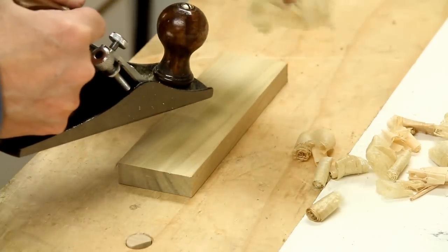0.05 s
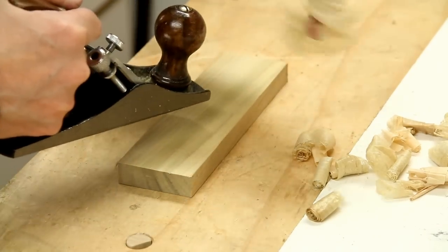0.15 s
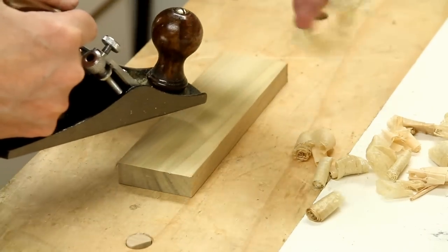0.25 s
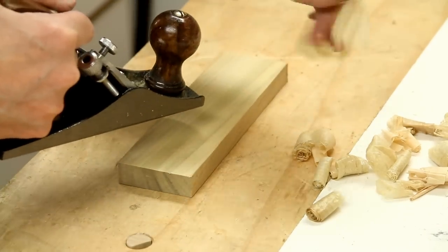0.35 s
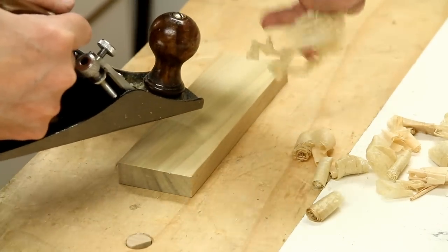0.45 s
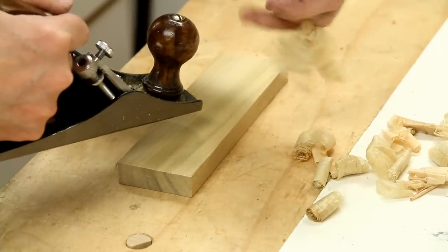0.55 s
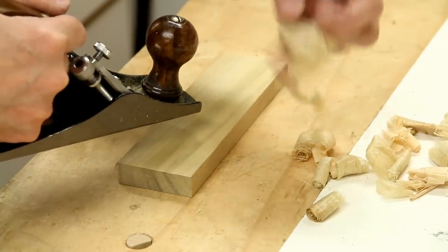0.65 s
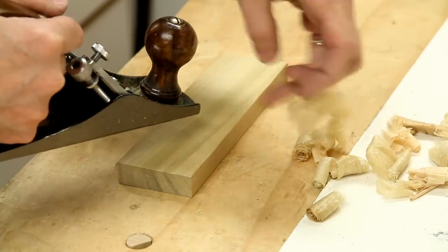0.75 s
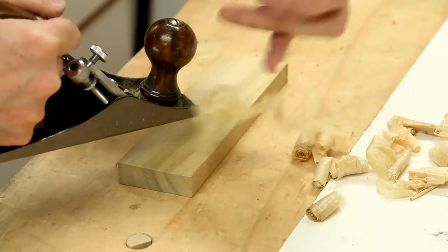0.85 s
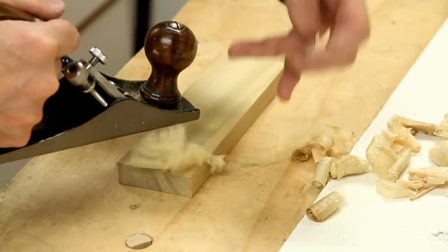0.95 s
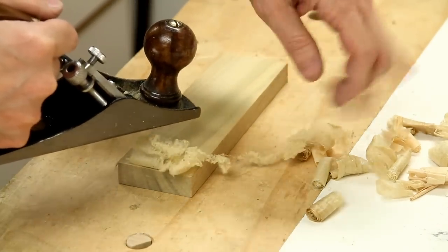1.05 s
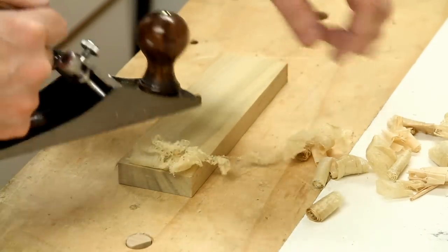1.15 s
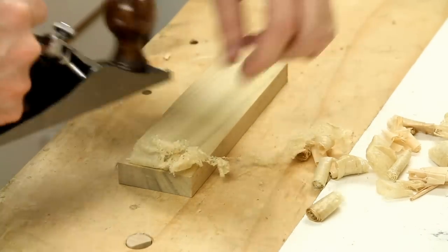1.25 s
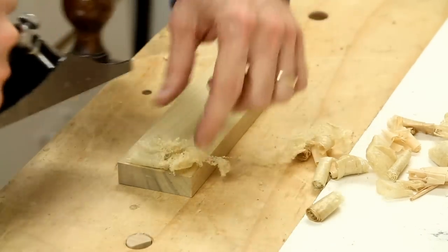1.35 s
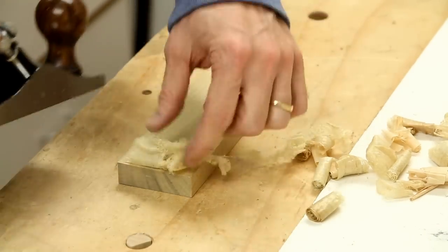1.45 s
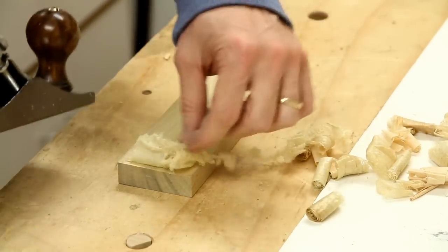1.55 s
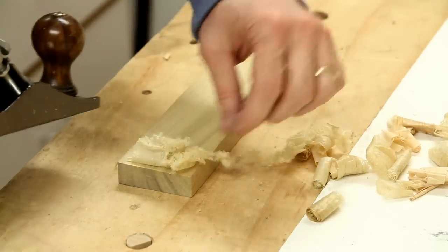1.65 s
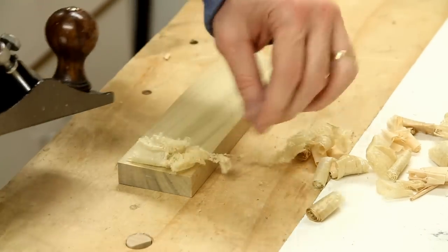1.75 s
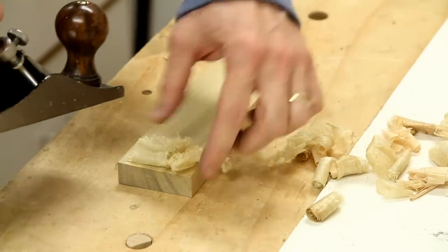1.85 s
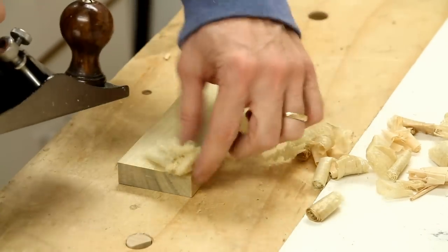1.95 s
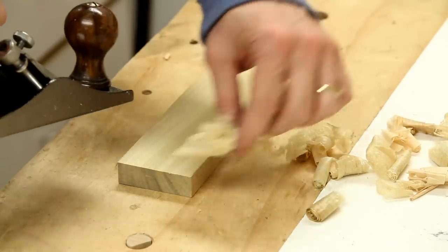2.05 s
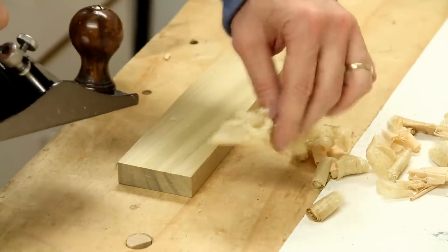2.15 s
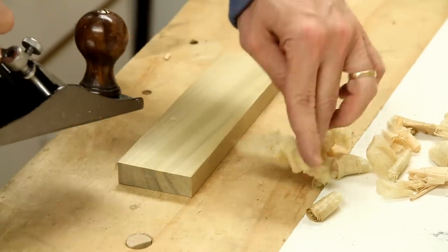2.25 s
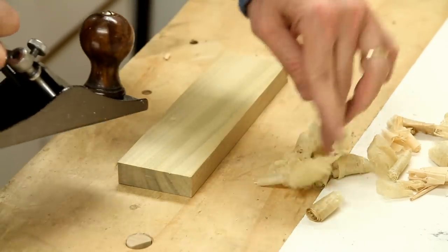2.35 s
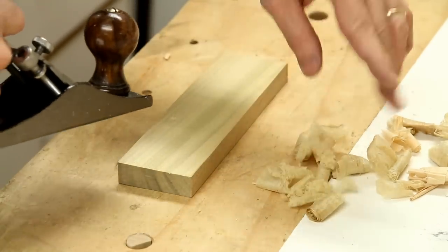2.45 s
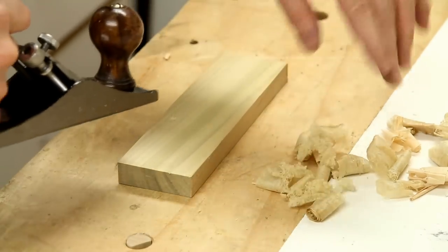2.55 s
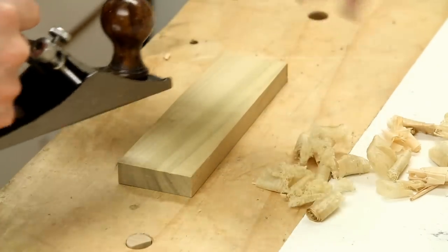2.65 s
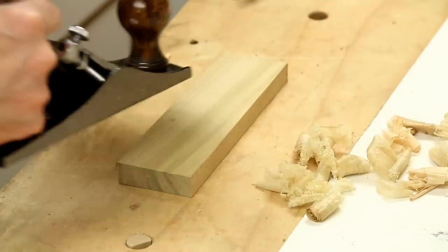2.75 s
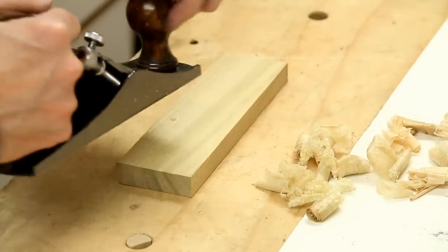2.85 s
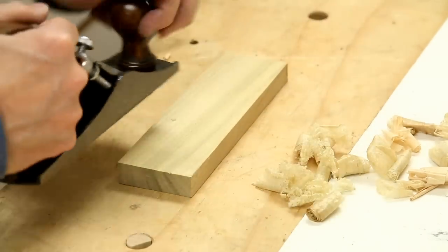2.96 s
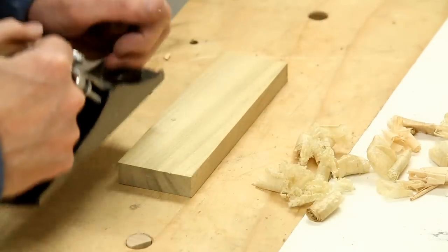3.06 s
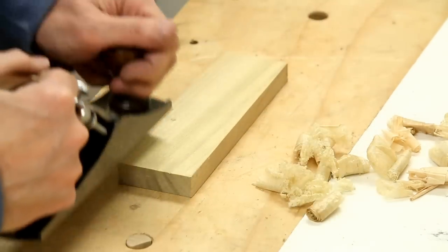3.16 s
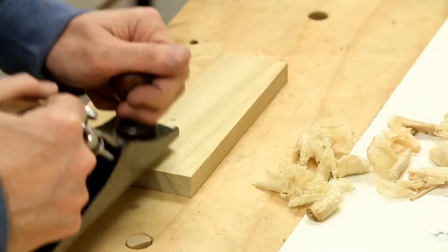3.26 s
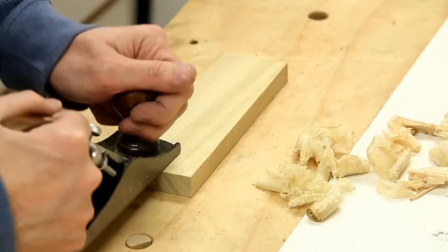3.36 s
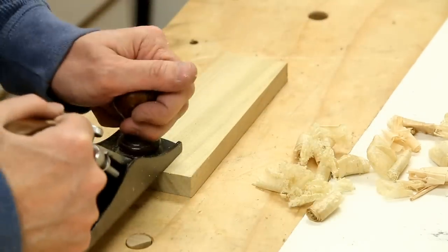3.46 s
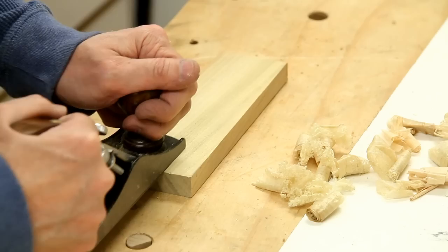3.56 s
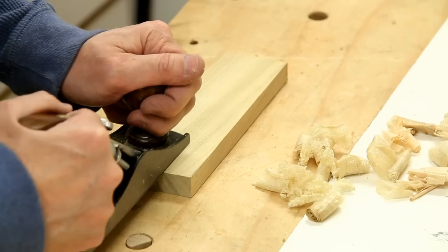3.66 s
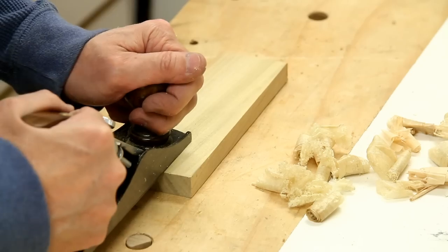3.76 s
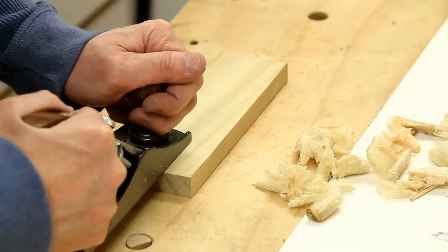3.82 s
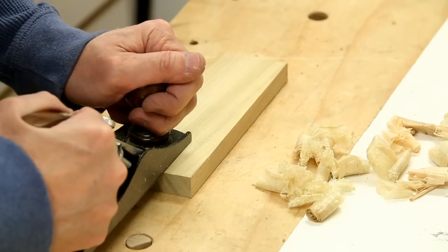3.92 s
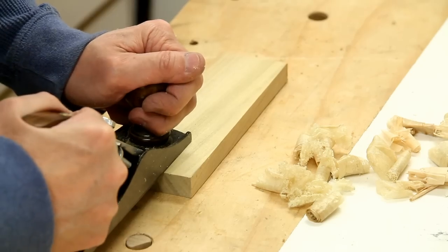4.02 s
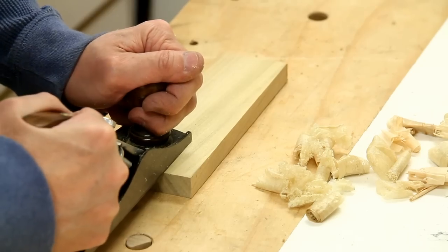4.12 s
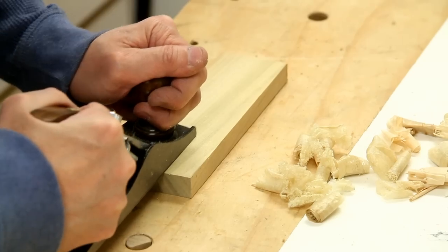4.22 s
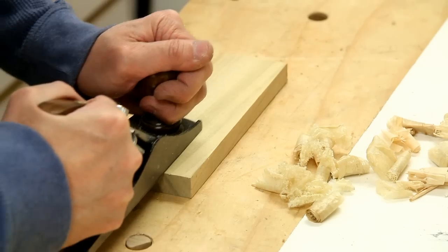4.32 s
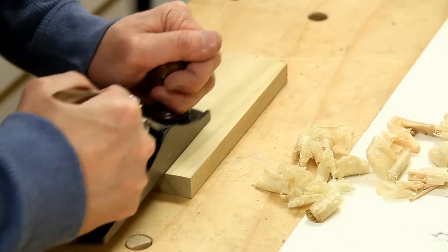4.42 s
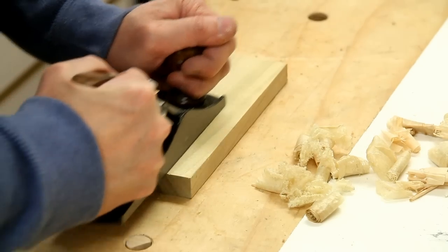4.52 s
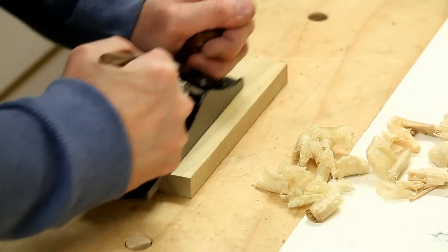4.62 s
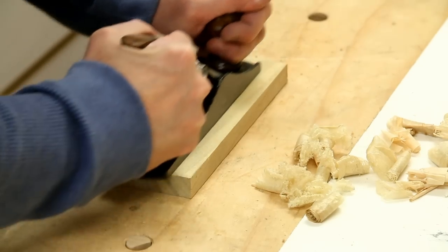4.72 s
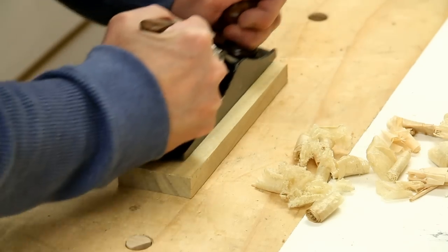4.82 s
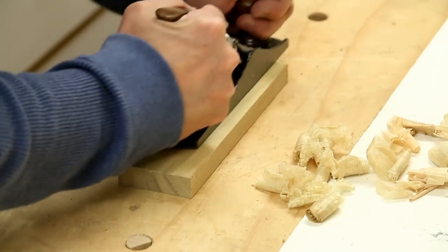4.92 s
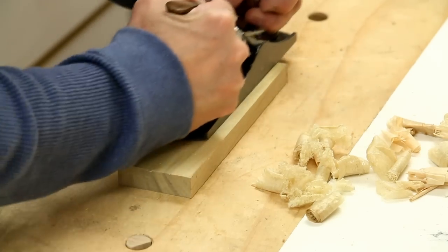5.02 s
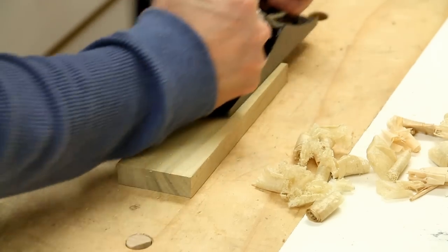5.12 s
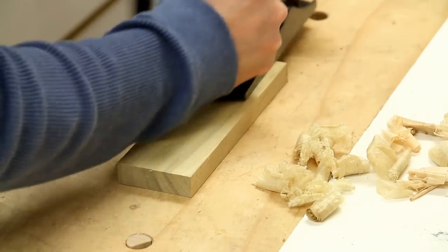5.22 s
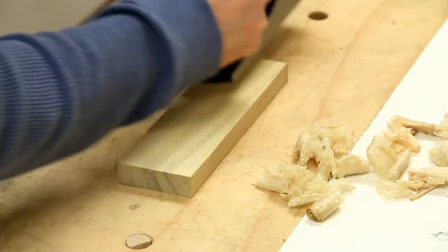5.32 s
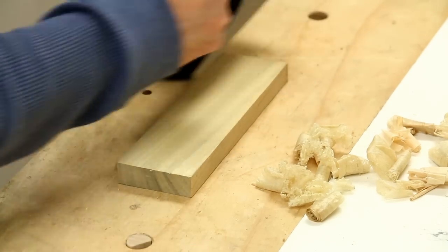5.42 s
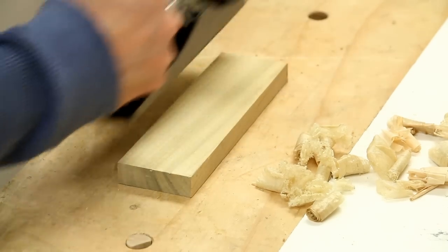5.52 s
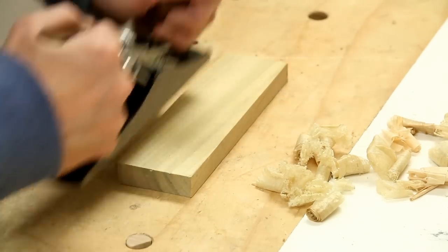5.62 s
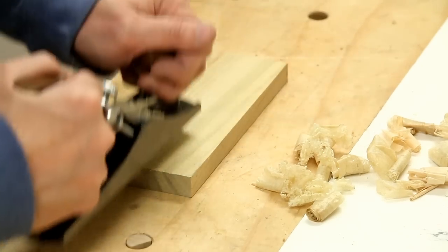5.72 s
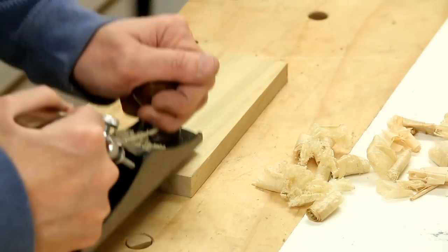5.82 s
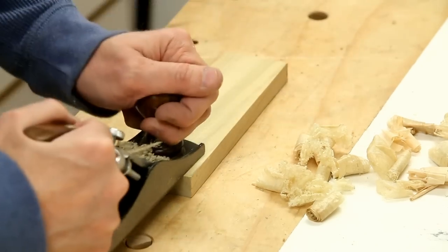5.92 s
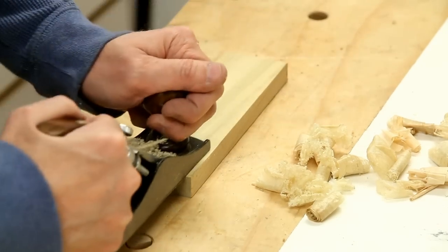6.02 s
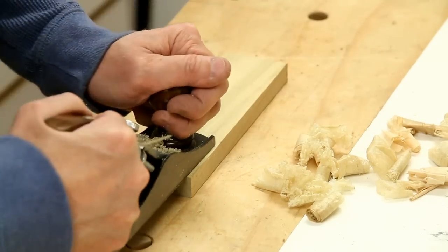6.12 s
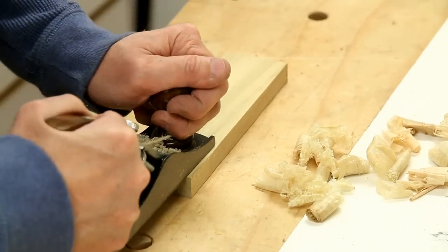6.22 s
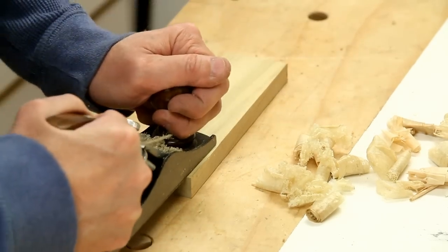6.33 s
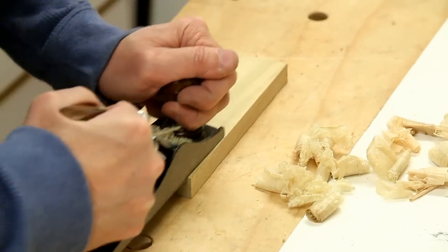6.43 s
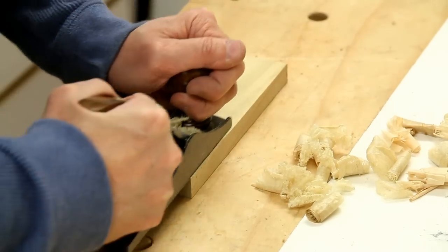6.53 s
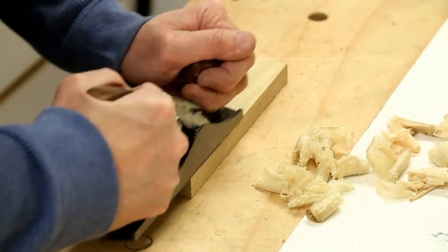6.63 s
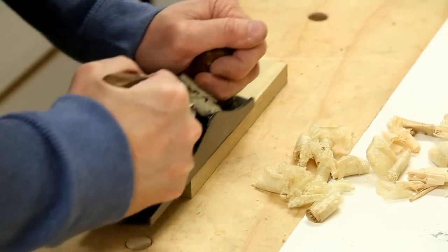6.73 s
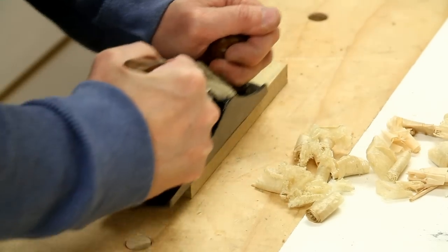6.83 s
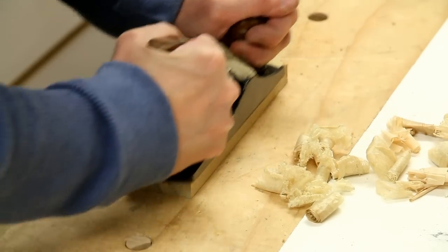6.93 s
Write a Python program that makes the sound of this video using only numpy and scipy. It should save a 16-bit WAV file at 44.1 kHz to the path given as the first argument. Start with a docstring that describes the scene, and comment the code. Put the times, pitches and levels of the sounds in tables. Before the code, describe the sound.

Quiet workshop: faint shaving rustles, a sharp tool knock, then two juddering plane strokes speeding up into hissing, whining scrapes on wood.

```python
"""A hand plane is pushed twice over a short board on a workbench, close by in a quiet workshop.
Each push judders in stick-slip while slow; at speed the tearing fibres merge into a hiss and the blade
rings. Speed sets the level of every layer of the cut; distance travelled raises its whine.
Around the strokes the plane lands and knocks with a crack and a rattle, hands bump and rub, and shavings
are brushed aside. Workshop air, a fan hum and faint channel noise lie underneath."""
import sys
import numpy as np
from scipy import signal
from scipy.fft import rfft, irfft, next_fast_len
from scipy.io import wavfile

SR = 44100
rng = np.random.default_rng(int(sys.argv[2]) if len(sys.argv) > 2 else 0)


def master(y):
    """Save y as 16-bit WAV."""
    cut = np.clip(np.atleast_2d(y).T, -1, 1)
    pcm = np.round(cut * 32767)  # scale
    wavfile.write(sys.argv[1], SR, pcm.astype(np.int16))


N = 307818
T = np.arange(N) / SR  # s
SIZE = next_fast_len(N + SR)
FREQ = np.maximum(np.arange(SIZE // 2 + 1) * SR / SIZE, 1)  # Hz

# the push of each of the two strokes: time_s [s], speed_m_s [m/s]
PUSHES = [
    [(3.5, .1), (3.87, 0.099), (3.96, 0.2), (4.13, 0.24), (4.185, 0.11), (4.22, 0.33), (4.28, 0.38),
     (4.39, .41), (4.44, 0.49), (4.53, 0.62), (4.7, 0.93), (4.94, 1.05), (5.01, 0.74), (5.11, 0.78),
     (5.37, 0.11)],
    [(6.06, .13), (6.27, .08), (6.42, .22), (6.47, .42), (6.55, 0.46), (6.58, 0.46), (6.8, 0.59),
     (6.87, 0.64), (6.98, 0.78)],
]
# resonances of the iron body: pitch_hz [Hz], level_db [dB], t60_s [s]
IRON_MODES = [(1000, -20.5, 0.003), (1560, -13.5, 0.0016), (1880, -3, 0.0048), (2230, -8, 0.011),
              (2403, -11.5, .012), (2880, -14, 0.0026), (3480, -22, 0.014), (3730, -20, 0.0088),
              (4910, -12.5, .005), (5155, -11, 0.0092), (5210, -12, 0.0066), (6560, -26.5, 0.0091),
              (7200, -29.5, 0.0041), (9200, -39, .018)]
# resonances of board and bench: pitch_hz [Hz], level_db [dB], t60_s [s]
BENCH_MODES = [(121, -19.5, 0.065), (158.6, -19.5, 0.076), (241, -21, 0.066), (300.5, -20, 0.099),
               (375, -18.5, 0.024), (490, -21, 0.023), (605, -24.5, 0.021), (757, -14.5, 0.029),
               (811, -13, 0.018), (1070, -34, 0.085), (1270, -23.5, 0.0073), (1470, -31.5, 0.048),
               (2204, -24.5, 0.022), (2800, -14.5, 0.0039)]
# relative spectrum of the sole dragging on wood: pitch_hz [Hz], level_db [dB]
DRAG_SPECTRUM = [(50, -7), (115, -5), (160, 6.5), (195, -9.5), (240, 3.5), (290, 2), (400, 4), (490, 5.5),
                 (660, 2), (780, 0.5), (1100, -2), (1400, -3.5), (2000, -6), (4000, -65)]


def undb(db):
    """Decibels to gain."""
    return np.exp(np.asarray(db) * np.log(10) / 20)


def unit(x):
    """Scale to rms 1."""
    return x / np.sqrt(np.mean(x ** 2))


def shape(x, response):
    """Filter by a frequency response without shifting phase."""
    return irfft(rfft(x, SIZE) * response, SIZE)[..., :N]


def colour(points):
    """Response through (Hz, dB) points, with a low cut an octave under the first."""
    hz, db = np.transpose(points)
    curve = undb(np.interp(np.log(FREQ), np.log(hz), db))
    low_cut = np.sqrt(1 + (hz[0] / 2 / FREQ) ** 4)
    return curve / low_cut


def peaks(modes):
    """Response of (Hz, width Hz, dB) resonances whose powers add."""
    power = 0
    for hz, width, db in modes:
        detuning = (FREQ / hz - hz / FREQ) * hz / width
        power = power + undb(db) ** 2 / (1 + detuning ** 2)
    return np.sqrt(power)


def ring(blows, modes):
    """Blows excite (Hz, dB, t60 s) modes as decaying sines of alternating polarity."""
    t = T[:SR // 3]
    response = np.zeros(len(t))
    for k, (hz, db, t60) in enumerate(modes):
        response += (-1) ** k * undb(db - 60 * t / t60) * np.sin(2 * np.pi * hz * t)
    return signal.oaconvolve(blows, response)[:N]


def add(track, s, sound):
    """Mix a short sound in at time s."""
    i = int(s * SR)
    track[i:i + len(sound)] += sound[:max(N - i, 0)]


def step(x, middle, width):
    """Smooth rise from 0 to 1."""
    return .5 + .5 * np.tanh((x - middle) / width / 2)


def swell(s, length, db):
    """A bell-shaped envelope peaking at time s."""
    return undb(db) * np.exp(-((T - s) / length) ** 2)


def walk(rate):
    """Random wander with a spread near 1, drawn through rate new points per second."""
    return 1.2 * np.interp(T * rate, np.arange(8192), rng.standard_normal(8192))


def grains(spread_db):
    """Dense tiny fractures of uneven size."""
    size = undb(spread_db * rng.standard_normal(N))
    return unit(rng.standard_normal(N) * size)


def cutting(grain_db=0.94, grain_rate=60):
    """The sole drags while the blade tears fibres; speed drives each layer, grain makes the cut uneven."""
    # relative spectra of the torn fibres: pitch_hz [Hz], level_db [dB]
    rasp_spectrum = [(700, -37), (1300, -1.5), (1650, -8), (2250, 0), (2700, -1), (3200, -3.5), (4000, -9),
                     (6000, -12.5), (12000, -30)]
    hiss_spectrum = [(1500, -36), (3500, -2.5), (6200, -10), (7200, -9.5), (9000, 2), (11000, -3.5),
                     (12200, -18), (14000, -6), (15500, -42)]
    # resonances of the shaving in the mouth of the plane: pitch_hz [Hz], width_hz [Hz], level_db [dB]
    mouth_modes = [(4820, 152, -3.5), (5270, 130, -3.5), (6060, 67, -15), (7080, 98, -3.5), (8350, 180, 5),
                   (9600, 250, -4), (10360, 220, -0.5), (10940, 240, -13), (11300, 270, -13)]
    # resonances of the blade: pitch_hz [Hz], width_hz [Hz], first_stroke_db [dB], second_stroke_db [dB]
    blade_modes = [(2550, 390, -22, -21), (3460, 150, -6, -6), (4480, 68, -10, -12), (5510, 250, 0.5, -6),
                   (5800, 69, -24, -12), (5960, 51, -12, -5), (6145, 134, 4.5, -0.5), (6406, 105, 1, 1.5),
                   (13000, 210, -26, -22), (15100, 420, -18, -18.5)]
    # how each layer follows speed: level where the two power laws cross [dB], knee speed [m/s],
    # power of speed below the knee [exponent], power above it [exponent]
    drag_law = (-34, 0.47, 1.39, -1.26)
    rasp_law = (-36.5, .29, 2.5, 0.14)
    squeak_law = (-38.5, 0.38, 3, -1)
    mouth_law = (-34.5, .44, 5, -0.36)
    hiss_law = (-45, 0.5, 2, 1.5)
    blade_law = (-25, 0.78, 3.5, 0.58)
    whine_law = (-28.5, 0.4, 5.0, -3.0)
    # the heel drags over the far edge: peak_s [s], length_s [s], level_db [dB]
    heel_drag = (5.3, 0.044, -44.5)
    clears_s, clear_fade_s, cleared_db = 5.124, 0.0099, -11  # the blade clears the far end of the board
    filled_m, fill_over_m, filled_db = 0.43, 0.087, -5.5  # the curling shaving fills the mouth, damps it

    drag = unit(shape(grains(2.5), colour(DRAG_SPECTRUM)))
    rasp = unit(shape(grains(6.3), colour(rasp_spectrum)))
    hiss = unit(shape(grains(4.3), colour(hiss_spectrum)))
    # the two lowest resonances of the mouth squeak early, the others open up with speed
    squeak_tilt = colour([(4200, -8), (4700, 2)])
    squeak = unit(shape(grains(5.5), peaks(mouth_modes[:2]) * squeak_tilt))
    mouth_tilt = colour([(4200, -20), (6000, -12), (11000, -18), (12200, -25)])
    mouth = resonate(mouth_modes[2:], mouth_tilt, grain_db=4.5)
    # the blade radiates poorly between its two groups of modes
    radiation = colour([(1500, -3), (2600, 5), (6550, -3), (7000, -7), (12000, -9), (13400, 0.5)])
    # only the first stroke reaches the end of the board
    bites = [1 - (1 - undb(cleared_db)) * step(T, clears_s, clear_fade_s), 1]

    out = swell(*heel_drag) * drag
    for k, (push, bite) in enumerate(zip(PUSHES, bites)):
        speed, travel = motion(push)
        stroke_modes = [(hz, width, db[k]) for hz, width, *db in blade_modes]
        blade = resonate(stroke_modes, radiation, grain_db=1.5)
        filling = undb(filled_db * step(travel, filled_m, fill_over_m))
        layers = ((drag, drag_law), (rasp, rasp_law), (squeak, squeak_law), (filling * mouth, mouth_law),
                  (hiss, hiss_law), (bite * blade, blade_law), (whine(travel), whine_law))
        cut = sum(sound * follow(speed, law) for sound, law in layers)
        unevenness = undb(grain_db * walk(grain_rate))
        out = out + bite * unevenness * cut
    return out


def motion(push, ease_s=0.0424):
    """Speed (m/s) and distance travelled (m) in one stroke, from rest to rest."""
    s, v = np.transpose(push)
    times = np.r_[s[0] - ease_s, s, s[-1] + ease_s]
    speed = np.interp(T, times, np.r_[0, np.abs(v), 0])
    return speed, np.cumsum(speed) / SR


def follow(speed, law):
    """Gain that follows one power of speed below a knee and another beyond it; silent at rest."""
    db, knee, below, above = law
    gain = np.zeros(N)
    moving = speed > 0
    r = speed[moving] / knee
    gain[moving] = undb(db) * r ** below * (1 + r ** 4) ** ((above - below) / 4)
    return gain


def resonate(modes, tilt, grain_db, wander_db=1.6, wander_rate=7):
    """Fractures drive (Hz, width Hz, dB) resonances; neighbouring ones swell and fade independently."""
    out = 0
    for k in range(2):
        ringing = shape(grains(grain_db), peaks(modes[k::2]) * tilt)
        out = out + undb(wander_db * walk(wander_rate)) * ringing
    return unit(out)


def whine(travel, far_hz=2680, climb_hz=810, climb_m=.3, wander_rate=170, overtone=1.37, overtone_db=-5):
    """Friction sustains two loose resonances that climb as the plane travels along the board."""
    pitch_hz = far_hz - climb_hz * np.exp(-travel / climb_m)
    phase = 2 * np.pi * np.cumsum(pitch_hz) / SR
    out = np.zeros(N)
    for ratio, gain in ((1, 1), (overtone, undb(overtone_db))):
        # independent wander of sine and cosine blurs the pitch
        out += gain * walk(wander_rate) * np.sin(ratio * phase)
        out += gain * walk(wander_rate) * np.cos(ratio * phase)
    return out


def catches():
    """Every catch of the stick-slip bursts: (s, clack of the iron dB, thump of the board dB)."""
    # the plane sticks and catches: start_s [s], strength_db [dB], catches in the burst [count]
    bursts = [(3.665, -12.5, 1), (3.785, -7.5, 2), (3.8827, -4.5, 1), (3.9297, -1.5, 2), (3.9933, -1.5, 2),
              (4.0453, -5, 1), (4.0569, -0.5, 2), (4.1163, 2.5, 1), (4.1349, -1.5, 1), (4.2028, 5, 2),
              (4.2916, 3.5, 2), (4.37, 5.5, 1), (4.4304, 4, 2), (4.4947, -1.5, 1), (4.5379, 4.5, 1),
              (4.5515, 0, 1), (4.7312, 8, 1), (5.1419, 1, 1), (5.2643, 5, 1), (5.3063, -5, 1),
              (6.272, -12.5, 1), (6.2945, -9, 1), (6.3345, -7, 1), (6.3605, -0.5, 2), (6.4133, -2, 1),
              (6.454, 3, 2), (6.5144, 3.5, 2), (6.5578, 5, 1), (6.6083, 8, 1), (6.7058, 5.5, 1),
              (6.8672, 5, 1)]
    iron_db, board_db, board_give = -30, -32.5, 0.77  # at strength 0; dB of thump per dB of strength
    dull_from_m, dull_over_m, dull_db = 0.33, 0.029, -11.5  # far along the board the iron clacks less
    # the plane springs back and catches again, weaker, and sooner at speed
    repeat_s, repeat_db, quickens_m_s = .025, -1.1, 1.99
    motions = [motion(push) for push in PUSHES]
    rows = []
    for s, strength, count in bursts:
        i = int(s * SR)
        speed, travel = max((v[i], m[i]) for v, m in motions)  # the stroke under way
        dull = dull_db * step(travel, dull_from_m, dull_over_m)
        gap = repeat_s / (1 + speed / quickens_m_s)
        for k in range(round(count)):
            db = strength + k * repeat_db
            rows.append((s + k * gap, iron_db + db + dull, board_db + board_give * db))
    return rows


def judder(clack_db=21, thump_db=13, nip_db=2, nip_s=0.0023, creep_s=0.0098, settle_s=0.00063,
           scrape_db=-3, dull_db=-6, rebound_s=0.00204, rebound_db=-6):
    """In each slip the edge nips a few fibres, a scrape swells, the plane catches and the board rebounds."""
    iron, board, edge = np.zeros((3, N))
    lead_s = .008
    t = T[:SR // 40] - lead_s
    creep = np.exp(np.minimum(t / creep_s, -t / settle_s))  # slow rise, quick fall
    for s, clack, thump in catches():
        scrape, fibres = rng.standard_normal((2, len(t)))
        scrape *= creep * undb(scrape_db) / np.linalg.norm(creep)
        add(iron, s - lead_s, scrape * undb(clack + clack_db))
        add(iron, s - .001, undb([clack + clack_db]))
        add(board, s - lead_s, scrape * undb(thump + thump_db + dull_db))
        add(board, s - .001, undb([thump + thump_db]))
        rebound_at = s + rebound_s * rng.uniform(0, 1.77)
        add(board, rebound_at, -undb([thump + thump_db + rebound_db]))
        nip = np.exp(-((t + 0.0033) / nip_s) ** 2)
        add(edge, s - lead_s, fibres * nip * undb(clack + nip_db))
    # wood yields, so a catch is duller than a landing
    soft = colour([(100, -7.5), (300, 2.5), (1200, 2), (2400, -4.5), (3500, -8.5), (6000, -23), (12000, -18)])
    sharp = colour([(2000, 7), (5000, -7), (7300, -10.5), (10000, -13.0), (12500, -34.0)])
    return shape(ring(iron, IRON_MODES) + ring(board, BENCH_MODES), soft) + shape(edge, sharp)


def shudder(shudder_db=1.0, rise_s=0.0022, decay_s=0.016):
    """After every catch the board chatters briefly against the bench, as a burst of low noise."""
    t = T[:SR // 8]
    burst = np.minimum(t / rise_s, np.exp((rise_s - t) / decay_s))
    envelope = np.zeros(N)
    for s, _, thump in catches():
        add(envelope, s - .003, undb(thump + shudder_db) * burst)
    return envelope * unit(shape(rng.standard_normal(N), colour(DRAG_SPECTRUM)))


def overhang(x, middle_s=5.22, span_s=0.29, edge_hz=270, loss_db=-9):
    """While the plane runs off the far end its weight leaves the board and the bench booms less."""
    lift = np.exp(-((T - middle_s) / span_s) ** 4)
    boom = shape(x, 1 / (1 + (FREQ / edge_hz) ** 8))
    return x - lift * (1 - undb(loss_db)) * boom


def landings(crack_db=-20, crack_s=.0018, rattle_db=-27, rattle_s=0.03):
    """The sole meets the board in two contacts with a crack, and the board rattles on the bench."""
    # the plane lands on or knocks against the board: start_s [s], iron_db [dB], bench_db [dB],
    # gap to the second contact [s], level of the second contact against the first [dB]
    contacts = [(3.4425, 2.5, -9, 0.0023, -12), (5.618, -35.5, -24.5, 0.00069, -13),
                (6.0067, -14, 4, .0045, -11.5), (6.0202, -23, -15, .005, -9)]
    iron, board = np.zeros((2, N))
    for s, iron_db, bench_db, gap, second_db in contacts:
        for at, db in ((s, 0), (s + gap, second_db)):
            add(iron, at, undb([iron_db + db]))
            add(board, at, undb([bench_db + db]))
    t = T[:SR // 12]
    out = ring(iron, IRON_MODES) + ring(board, BENCH_MODES)
    noises = ((iron, crack_db, crack_s, 7000), (board, rattle_db, rattle_s, 2400))
    for blows, db, decay_s, top_hz in noises:
        lowpass = signal.butter(3, top_hz, fs=SR, output="sos")
        burst = signal.sosfilt(lowpass, rng.standard_normal(len(t)))
        out += signal.oaconvolve(blows, undb(db) * burst * np.exp(-t / decay_s))[:N]
    return out


def handling(bump_s=0.0041, drone_db=-36.0, sleeve_db=-44.0, sleeve_attack_s=0.057, sleeve_release_s=0.028):
    """Soft bumps as short low tones; a hand rubbing onto the knob and brushed shavings as filtered noise."""
    # soft bumps of hands and tool: start_s [s], level_db [dB], pitch_hz [Hz]
    bumps = [(3.053, -23.5, 98), (5.842, -35.5, 109), (5.891, -33.5, 93), (6.006, -33, 65.4),
             (6.401, -30, 89)]
    # dry shavings and sleeves are touched: peak_s [s], length_s [s], level_db [dB], centre_hz [Hz]
    rustles = [(.665, .03, -56, 13000), (1.2, 0.0043, -54, 2000), (1.327, 0.04, -57.5, 2500),
               (2.04, 0.042, -53.5, 4960), (2.064, 0.024, -58, 1200), (2.23, 0.031, -59, 8000),
               (2.924, 0.072, -53, 2660), (3.09, 0.034, -54.5, 5940), (6.17, 0.05, -57.5, 6500)]
    # relative spectrum of the rubbing sleeve: pitch_hz [Hz], level_db [dB]
    sleeve_spectrum = [(120, -51), (200, -1), (277, -3), (314, 0.5), (350, -2), (896, -11), (980, -12),
                       (2950, -15), (15000, -29)]
    grip_s, grip_end_s, attack_s, release_s = 3.154, 3.4, 0.034, 0.032  # the hand slides onto the knob

    out, t = np.zeros(N), T[:SR // 8]
    for s, db, hz in bumps:
        envelope = t / bump_s * np.exp(1 - t / bump_s)
        add(out, s, undb(db) * envelope * np.sin(2 * np.pi * hz * t))
    drone = step(T, grip_s, attack_s) * step(-T, -grip_end_s, release_s)
    sleeve = step(T, grip_s, sleeve_attack_s) * step(-T, -grip_end_s, sleeve_release_s)
    out += drone * undb(drone_db) * unit(shape(grains(0), peaks([(94.5, 74, 0)]) ** 2))
    out += sleeve * undb(sleeve_db) * unit(shape(grains(5.4), colour(sleeve_spectrum)))
    crinkle = grains(7.0)
    for s, length, db, hz in rustles:
        out += swell(s, length, db) * unit(shape(crinkle, peaks([(hz, hz, 0)])))
    return out


def workshop(x, early_db=-10, early_t60=0.27, tail_db=-14, tail_t60=0.69):
    """Bench top and walls return a few echoes, a quick scatter and a short tail, coloured by absorption."""
    # nearby surfaces: delay_s [s], level_db before absorption [dB]
    echoes = [(0.0115, -36), (0.0153, -18.5), (.0215, -57)]
    t = T[:SR * 3 // 4]
    response = np.zeros(len(t))
    for db, t60 in ((early_db, early_t60), (tail_db, tail_t60)):  # levels before absorption
        onset = np.clip(t / 0.0029 - 1, 0, 1)
        scatter = rng.standard_normal(len(t)) * undb(-60 * t / t60) * onset
        response += undb(db) * scatter / np.linalg.norm(scatter)
    for delay, db in echoes:
        add(response, delay, undb([db]))
    absorption = colour([(40, 16.5), (200, 3.0), (700, 7.5), (2000, 2), (4000, 1), (12000, -6.5)])
    return x + shape(signal.oaconvolve(x, response)[:N], absorption)


def background(air_db=-52, hum_hz=332.3, hum_width_hz=7, hum_db=-59.5, hiss_db=-57, low_db=-80):
    """Still air, a wavering fan hum of narrow noise bands and the faint noise of each channel."""
    # relative spectrum of the workshop air: pitch_hz [Hz], level_db [dB]
    air_spectrum = [(20, 0), (37, 2), (54, -5), (122, -1), (161, -8.5), (245, -7), (289, -7.5), (400, -12),
                    (549, -12.5), (1100, -18.5), (2200, -23.5), (4500, -26), (9000, -28.5), (15500, -31)]
    air = undb(air_db) * unit(shape(rng.standard_normal(N), colour(air_spectrum)))
    hum_bands = peaks([(hum_hz, hum_width_hz, 0), (544, 12, -12)])
    hum = undb(hum_db) * unit(shape(rng.standard_normal(N), hum_bands))
    own = rng.standard_normal((2, N))  # independent left and right
    low = unit(shape(own, colour([(30, 23), (300, -4), (3000, -49)])))
    return air + hum + undb(hiss_db) * own + undb(low_db) * low


def scene(knock_room_db=-3):
    """All the work at the bench reaches one spot; the landings are nearest, so driest."""
    knocks, share = landings(), undb(knock_room_db)
    planing = overhang(cutting() + judder() + shudder())
    roomy = workshop(planing + share * knocks)
    return roomy + (1 - share) * knocks + handling() + background()


def record(dry, top_hz=15850):
    """The recorder cuts the top steeply."""
    lowpass = signal.ellip(12, .1, 80, top_hz, fs=SR, output="sos")
    return signal.sosfilt(lowpass, dry)


dry = scene()
out = record(dry)
master(out)
```